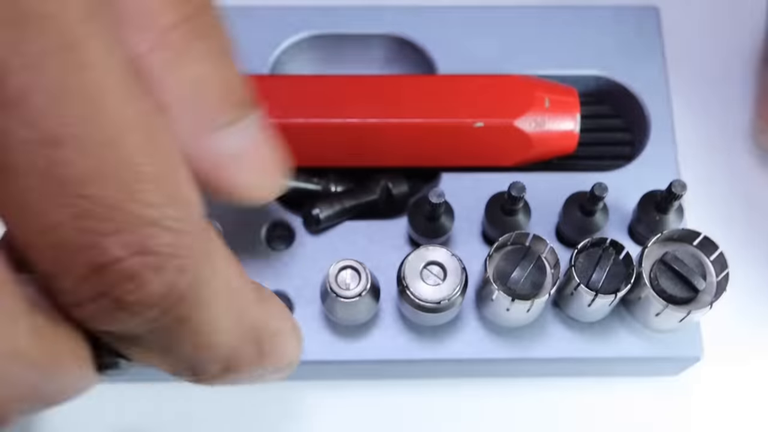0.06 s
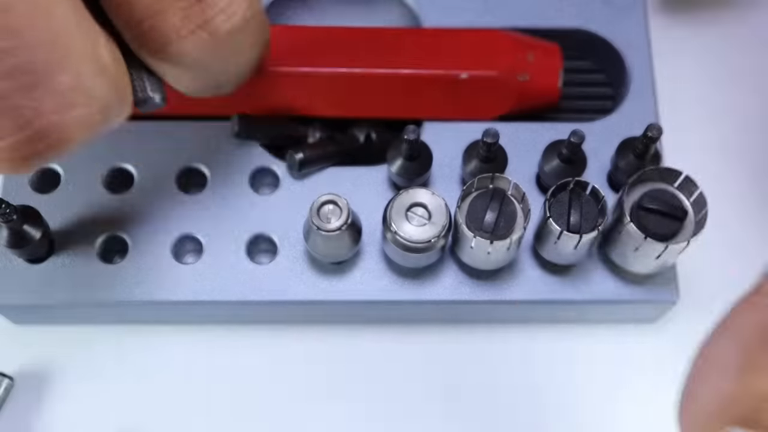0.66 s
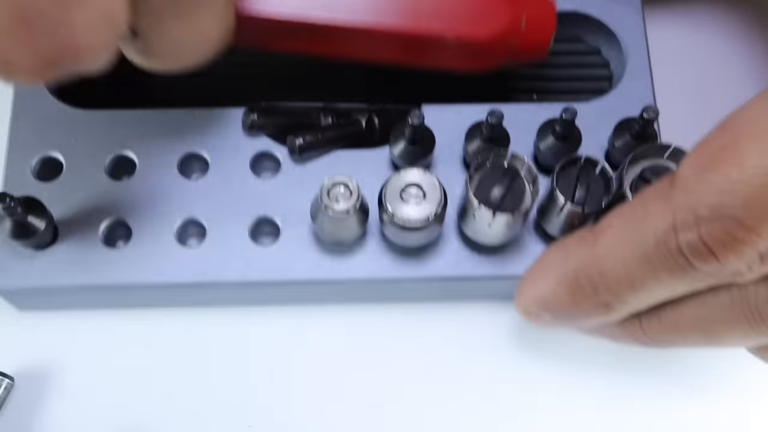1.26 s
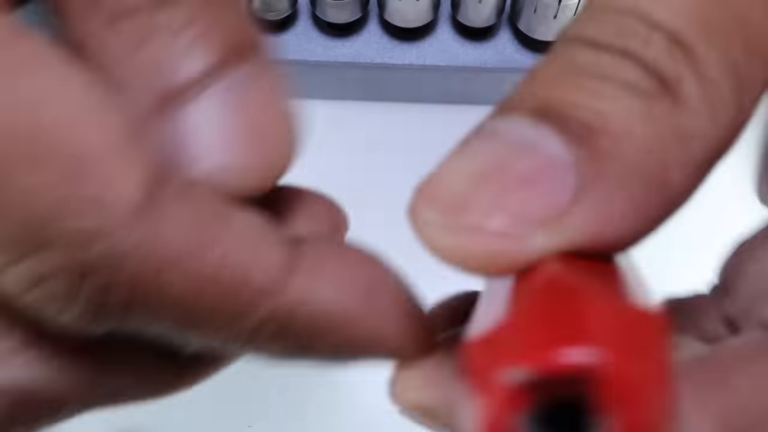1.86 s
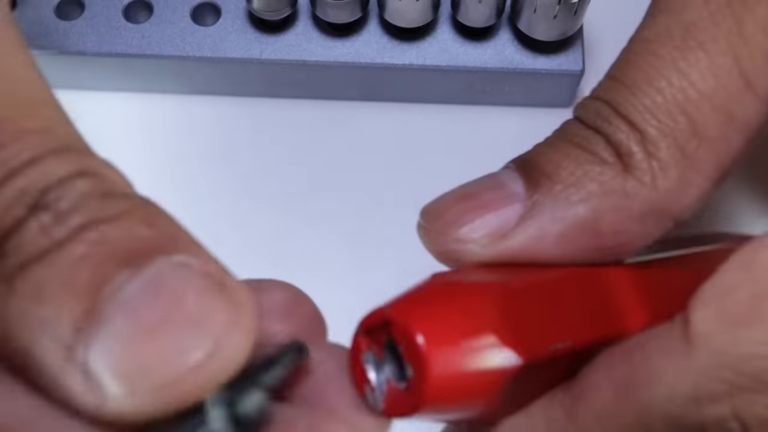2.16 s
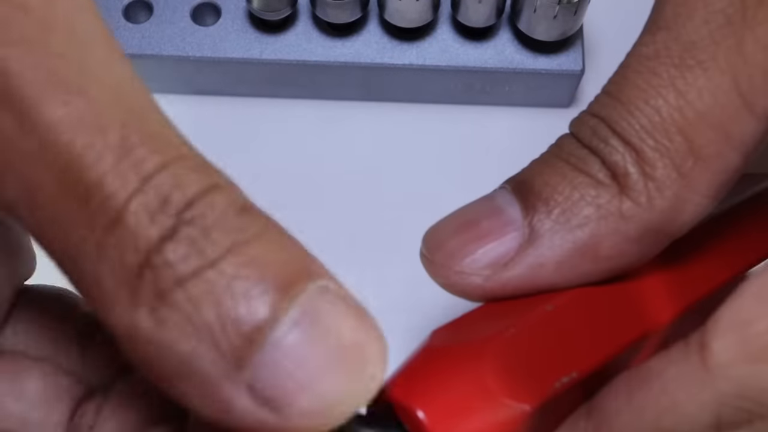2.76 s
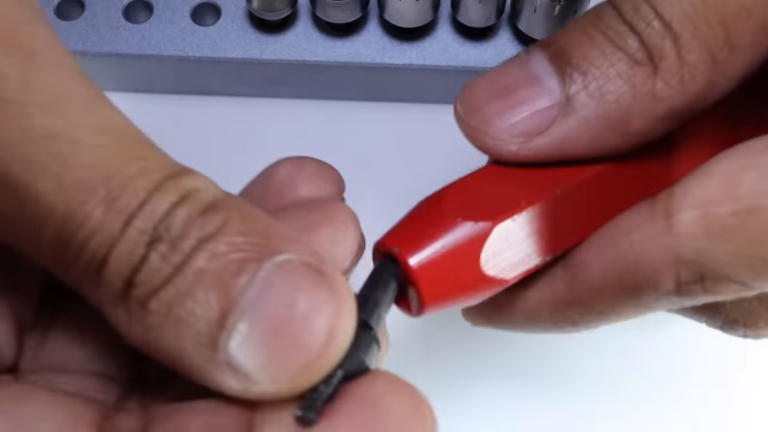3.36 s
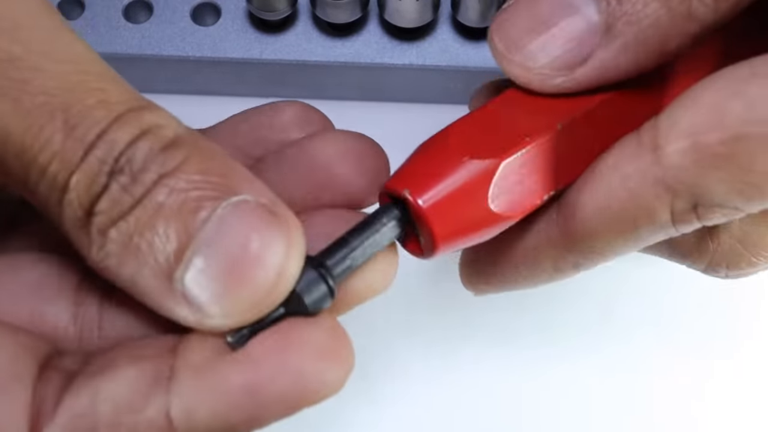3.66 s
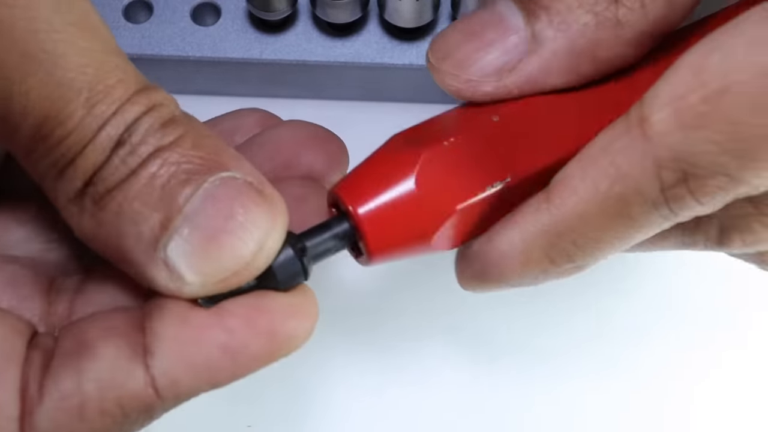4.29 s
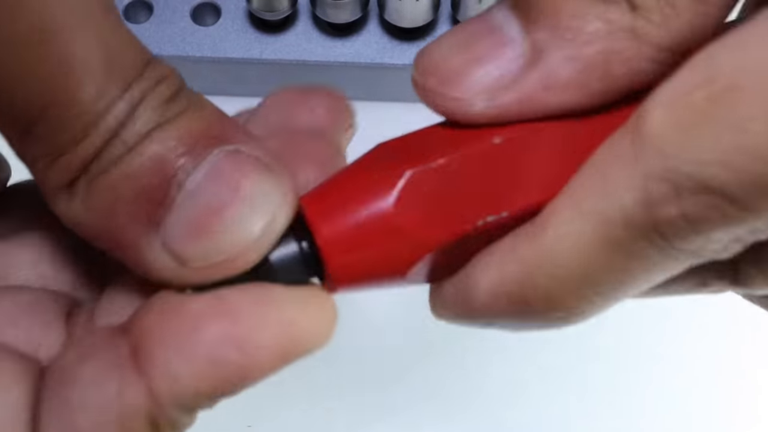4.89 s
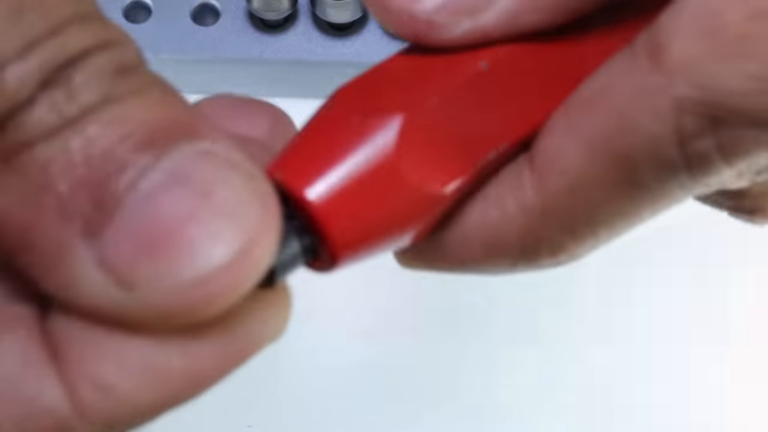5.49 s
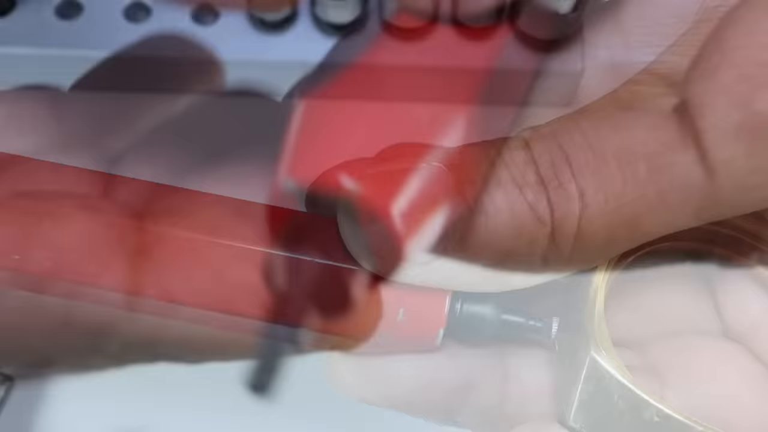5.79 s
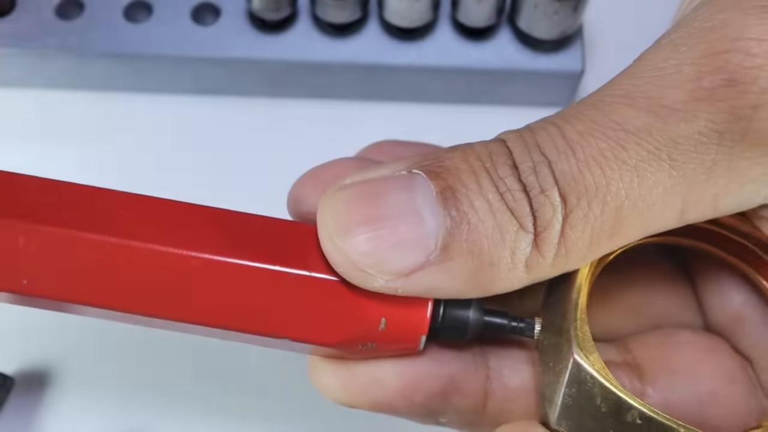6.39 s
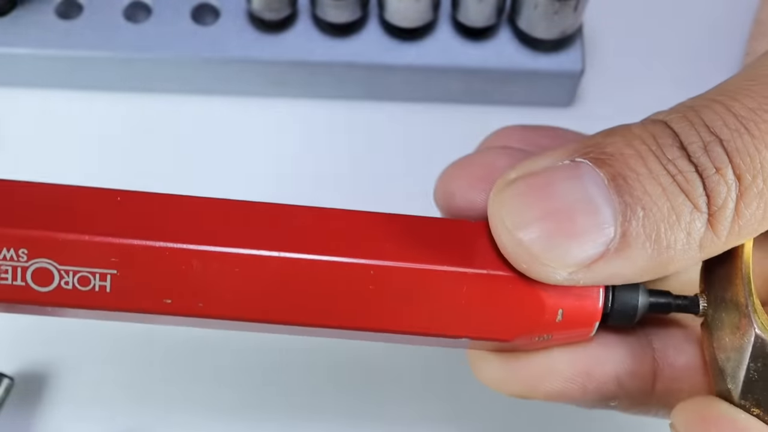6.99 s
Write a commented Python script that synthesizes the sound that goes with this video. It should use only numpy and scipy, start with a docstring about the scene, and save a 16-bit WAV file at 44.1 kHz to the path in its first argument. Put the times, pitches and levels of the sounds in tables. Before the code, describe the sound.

A metal holder block knocks on a workbench, a steel bit ticks and clicks into a handle, and the tool snaps against a watch case.

```python
"""A steel bit and a handle are lifted from a metal holder block, which knocks and slides on a workbench.
Up close, the bit ticks and scrapes at the handle's socket and clicks home; later the tool snaps hard
against a metal watch case. Hits are ringing modes plus a burst of noise; rubs and slides are grainy
noise. A small room answers, over mains hum and a soft hiss."""
import sys
import numpy as np
from scipy import signal
from scipy.fft import rfft, irfft, next_fast_len
from scipy.io import wavfile
from scipy.ndimage import uniform_filter1d, map_coordinates

SR = 44100
rng = np.random.default_rng(int(sys.argv[2]) if len(sys.argv) > 2 else 0)


def waveform_to_disk(signal):
    """Save audio, clipped to [-1, 1], as 16-bit WAV at the path in sys.argv[1]."""
    frames = np.transpose(np.atleast_2d(signal))
    scaled = np.clip(frames, -1, 1) * 32767
    samples = np.round(scaled).astype(np.int16)
    wavfile.write(sys.argv[1], SR, samples)


N = 310464
TIME = np.arange(N) / SR
T = np.arange(SR // 3) / SR  # time within one hit


def amp(db):
    """Decibels to gain."""
    return 10 ** (np.asarray(db) / 20)


def unit(x):
    """Scale to rms 1."""
    return x / np.sqrt(np.mean(x ** 2) + 1e-20)


def punch(x):
    """Scale a hit so that its loudest three milliseconds have rms 1."""
    return x / np.sqrt(uniform_filter1d(x ** 2, 128).max() + 1e-20)


def along(points, hz):
    """Read (frequency, value) points on a log axis."""
    freqs, values = np.transpose(points)
    return np.interp(np.log(hz + 1), np.log(freqs + 1), values)


def wobble(rate):
    """A smooth random curve, rate knots a second."""
    return map_coordinates(rng.standard_normal(int(N * rate / SR) + 4), [TIME * rate])


def colour(x, spectrum):
    """Minimum-phase EQ through (frequency, level) points."""
    size = 2 * next_fast_len(len(x))
    cepstrum = irfft(np.log(amp(along(spectrum, np.fft.rfftfreq(size, 1 / SR)))))
    cepstrum[1:size // 2] *= 2
    cepstrum[size // 2 + 1:] = 0
    return irfft(rfft(x, size) * np.exp(rfft(cepstrum)))[:len(x)]


def noise(spectrum):
    """Steady coloured noise of rms 1."""
    return unit(colour(rng.standard_normal(N), spectrum))


def friction(spectrum, grain_db, rate):
    """Noise made of tiny slips of uneven strength."""
    return unit(colour(rng.standard_normal(N) * amp(grain_db * wobble(rate)), spectrum))


def crack(spectrum, t60):
    """The noise burst of two surfaces meeting."""
    return punch(colour(rng.standard_normal(len(T)) * amp(-60 * T / t60), spectrum))


def ring(modes, scatter_db, attack):
    """Decaying modes, their levels scattered anew on each hit."""
    hz, db, t60 = np.transpose(modes)[:, :, None]
    strength = db + scatter_db * rng.standard_normal(hz.shape)
    sign = (-1) ** np.arange(len(hz))[:, None]  # neighbouring modes swing opposite ways
    waves = sign * np.sin(2 * np.pi * hz * T)
    return punch((amp(strength - 60 * T / t60) * waves).sum(0) * (1 - np.exp(-T / attack)))


def strokes(rows, attack, release):
    """Envelope of strokes: each rises, holds, then falls 60 dB per release time."""
    gain = np.zeros(N)
    for s, length, db in rows:
        rise = np.clip((TIME - s) / attack, 0, 1)
        gain += rise * amp(db - 60 * np.maximum(TIME - s - length, 0) / release)
    return gain


def place(s, sound):
    """A full-length track with the sound at time s."""
    return np.pad(sound, (round(s * SR), N))[:N]


# small-room reverb: (frequency [Hz], t60 [s], level [dB])
REVERB = [(149.6, 0.34, -5.5), (800, 0.3, 3), (1990, 0.42, 0.5), (3540, 0.43, -5.5), (4600, 0.45, -3),
          (7460, 0.44, -14), (11000, 0.21, 2.5), (14900, 0.26, -14)]
def room(x, wet_db):
    """A sound plus a diffuse tail that builds fast and dies at each frequency's own speed."""
    hz, t, bands = signal.stft(rng.standard_normal(SR // 2), SR, nperseg=256)
    t60, echo_db = (along(np.array(REVERB)[:, [0, k]], hz)[:, None] for k in (1, 2))
    tail = signal.istft(bands * amp(echo_db - 60 * t / t60), SR, nperseg=256)[1]
    tail *= 1 - np.exp(-np.arange(len(tail)) / SR / .0011)
    wet = amp(wet_db) * signal.fftconvolve(x, tail / np.linalg.norm(tail))
    return wet + np.pad(x, (0, len(tail) - 1))


# mains partials: (frequency [Hz], level [dB])
HUM = [(50, -56.5), (100, -55.5), (150, -77), (200, -66), (300, -77.5), (350, -78.5), (400, -77.5)]
# EQ of the centred room tone and of the wide hiss: (frequency [Hz], level [dB])
AIR_EQ = [(20, -3.5), (50, -2.5), (130, -4.5), (220, -3.5), (300, -22.5), (480, -15.5), (700, -19.5),
          (870, -18), (1300, -25.5), (3000, -31), (6000, -31), (12500, -30.5), (13500, -59), (16000, -69)]
HISS_EQ = [(100, -31), (350, -2.5), (12400, -2.5), (13200, -28)]
def room_tone():
    """A stereo bed of gently wavering mains hum and soft hiss."""
    side = amp(-76.5) * noise(HISS_EQ)
    hum = np.zeros(N)
    for hz, db in HUM:
        peak = np.sqrt(2) * amp(db + .3 * wobble(8.7))
        hum += peak * np.sin(2 * np.pi * (hz * TIME + rng.random()))
    mid = hum + amp(-63.5) * noise(AIR_EQ)
    return np.array([mid + side, mid - side])


# finger rubs on the handle, weight shifts on the bench: (time [s], length [s], level [dB])
RUBS = [(0, 0.13, -66.5), (.26, 0.074, -64.5), (.75, 0.017, -66), (1.07, 0.023, -67.5), (1.57, 0.26, -69),
        (2.26, 1.4, -75.5), (4.57, 0.27, -74), (4.68, 0.041, -67.5), (4.94, 0.11, -69.5)]
SHIFTS = [(.06, 0.034, -60), (.75, 0.082, -55.5), (.9, 0.089, -57), (1.107, .12, -52.5),
          (3.583, 0.022, -58), (4.55, 0.22, -68.5)]
# EQ of bright skin rustle and dull handling: (frequency [Hz], level [dB])
SKIN_EQ = [(300, -30), (1400, -3), (1900, -8), (2500, -3.5), (3100, -4.5), (3750, 0), (4400, -7.5),
           (5200, -6.5), (7000, -14), (10000, -20.5), (16000, -51)]
HANDLING_EQ = [(100, -10), (200, -1), (400, -4.5), (650, -9), (880, -1), (1150, -16), (2000, -25.5),
               (10000, -69)]
def hands():
    """Fingers rub and hands shift; even held still they rustle, less as they settle."""
    holding = amp(-61 - 2.13 * TIME)
    rub = np.hypot(strokes(RUBS, attack=.015, release=.7), amp(-79))
    shift = np.hypot(strokes(SHIFTS, attack=.009, release=.34), holding)
    skin = rub * friction(SKIN_EQ, grain_db=1, rate=200)
    return skin + shift * friction(HANDLING_EQ, grain_db=1.94, rate=150)


# modes of the block's metal, its hollow body and the bench: (frequency [Hz], level [dB], t60 [s])
METAL_MODES = [(2250, -14, .025), (3430, -4, .016), (3780, 0, .022), (4080, -3, .015), (4600, -5, .02),
               (5400, -6, .018), (5780, -6, .024), (7250, -16, .022)]
HOLLOW_MODES = [(494, -1.5, 0.18), (760, -11, 0.088), (856, 10.5, 0.073), (969, -2, 0.092),
                (1100, -1.5, .05), (1350, -10, 0.034)]
BENCH_MODES = [(165.8, -1.5, 0.16), (222.6, 4, 0.072), (272, -8, 0.072), (347, -14, 0.056)]
# EQ of their transients: (frequency [Hz], level [dB])
CLACK_EQ = [(300, -21), (1000, -17), (2000, 0), (2800, 3.5), (3800, 4.5), (5800, 3), (8000, -8.5),
            (13000, -1.5), (16000, -15)]
KNOCK_EQ = [(200, -42), (450, 3), (900, 3.5), (1300, -3.5), (2200, -20.5), (4000, -37), (10000, -58)]
THUMP_EQ = [(60, -37), (130, -22), (220, 1.5), (400, -12.5), (700, -24), (2000, -75), (8000, -52)]
def block_hit(s, clack_db, knock_db, reach_hz, thump_over_knock_db=-9):
    """Metal clack, hollow knock and bench thump; a harder contact favours the upper modes."""
    metal = ring(METAL_MODES, scatter_db=5, attack=.000067) + amp(-.5) * crack(CLACK_EQ, t60=.018)
    low_cut = signal.butter(2, .46 * reach_hz, "high", fs=SR, output="sos")
    high_cut = signal.butter(4, reach_hz, fs=SR, output="sos")
    clack = punch(signal.sosfilt(high_cut, signal.sosfilt(low_cut, metal)))
    thump = ring(BENCH_MODES, scatter_db=2, attack=.001) + amp(-5) * crack(THUMP_EQ, t60=.037)
    knock = ring(HOLLOW_MODES, scatter_db=5, attack=.000081) + amp(1) * crack(KNOCK_EQ, t60=.045)
    body = punch(knock) + amp(thump_over_knock_db) * punch(thump)
    return place(s, room(amp(clack_db) * clack, wet_db=-15.5) + room(amp(knock_db) * body, wet_db=-7.5))


# fingers landing on the block: (time [s], thump level [dB])
PRESSES = [(.2915, -38), (0.3359, -30.5), (.374, -43), (1.106, -38)]
def presses():
    """Fingers press the block against the bench; flesh hardly stirs the metal."""
    return sum(block_hit(s, db - 20, db - 14.5, reach_hz=7000, thump_over_knock_db=14.5)
               for s, db in PRESSES)


# steel hits on the block: (time [s], clack level [dB], knock level [dB], treble reach [Hz])
CLACKS = [(0.4297, -33.5, -39.5, 10500), (0.4774, -36, -45, 4040), (0.5034, -48, -44.5, 6000),
          (0.551, -51, -55, 4370), (0.9264, -34, -42, 5140), (1.1867, -44.5, -41, 4300),
          (1.25, -37, -36, 3180), (1.5221, -46.5, -57, 9000), (1.5654, -37, -56, 10900),
          (1.6582, -48.5, -60, 6500)]
def clacks():
    """Steel strikes the block, with a lighter graze just ahead of each hit."""
    out = np.zeros(N)
    for s, clack_db, knock_db, reach_hz in CLACKS:
        out += block_hit(s - .009, clack_db - 16, knock_db - 16, reach_hz=5500)
        out += block_hit(s, clack_db, knock_db, reach_hz)
    return out


# pushes on the block: (time [s], length [s], level [dB])
SLIDES = [(.425, 0.121, -56), (1.255, .32, -54.5)]
# EQ of bench drag and steel grit: (frequency [Hz], level [dB])
DRAG_EQ = [(150, 1), (400, 7.5), (650, -3), (880, 11), (1200, -2), (2300, -5.5), (3900, 1.5), (4800, -8.5),
           (5800, -5), (8500, -20), (14500, -23), (16000, -30)]
GRIT_EQ = [(1000, -30), (3000, -11), (4700, 2), (6000, 0), (8000, -9), (12000, -20), (16000, -21)]
def slides():
    """The block drags and chatters over the bench, while steel scrapes grittily on it."""
    push = strokes(SLIDES, attack=.0068, release=.23)
    drag = friction(DRAG_EQ, grain_db=2.5, rate=700)
    grit = amp(-9) * friction(GRIT_EQ, grain_db=3, rate=250)
    out = room(push * (drag + grit), wet_db=-11)[:N]
    chatter_s, scatter_db = .028, 3.5
    for s, length, db in SLIDES:
        gaps, sizes = rng.standard_normal((2, 16))
        delays = np.cumsum(chatter_s * np.exp(gaps / 2)) - chatter_s / 2
        for delay, size in zip(delays, sizes):
            if 0 < delay < length:
                out += block_hit(s + delay, db + scatter_db * size, db, reach_hz=7500)
    return out


# jolts to the loose bits: (time [s], level [dB])
JINGLES = [(0.432, -47.5), (.552, -61), (1.271, -57), (1.285, -64)]
# their thin ring: (frequency [Hz], level [dB], t60 [s])
LOOSE_MODES = [(7170, 1, .025), (10200, -1, .03), (11550, -8, .13), (13080, -2, .06)]
def jingles():
    """Jolts shake the loose bits in their holes."""
    return sum(place(s, room(amp(db) * ring(LOOSE_MODES, scatter_db=3, attack=.00035), wet_db=-17))
               for s, db in JINGLES)


def rocking():
    """Freed of the handle, the block rocks: three quick contacts, each 1 dB softer."""
    return sum(block_hit(1.268 + .018 * k, clack_db=-39.5 - k, knock_db=-51 - k, reach_hz=7500)
               for k in range(3))


# rubs of the shank: (time [s], length [s], level [dB], starting pitch [Hz])
SCRAPES = [(1.555, .012, -38, 4500), (2.894, 0.01, -58.5, 1300), (3.785, 0.008, -39.5, 2930),
           (4.024, 0.0085, -59, 2580), (4.667, 0.026, -46, 1707), (4.734, 0.019, -48.5, 1464)]
# EQ of steel touching steel: (frequency [Hz], level [dB])
STEEL_EQ = [(300, -14), (1000, -6), (2200, 3.5), (3800, 4.5), (4800, -0.5), (8000, -5), (9500, 2.5),
            (11000, -22), (14000, -17), (16000, -56)]
def scrapes():
    """The bit's shank rubs along the socket, squeaking upward as it speeds up."""
    out = np.zeros(N)
    glide_hz_per_s = 110000
    for s, length, db, start_hz in SCRAPES:
        pressure = np.interp(T / length, [0, .3, .85, 1.1], [.22, .55, 1, .0012])  # grows, slips free
        rub = colour(pressure * rng.laplace(size=len(T)), STEEL_EQ)
        pitch = start_hz + glide_hz_per_s * np.minimum(T, length)
        squeak = pressure * wobble(884)[:len(T)] * np.sin(2 * np.pi * np.cumsum(pitch) / SR)
        out += place(s, room(amp(db) * punch(punch(rub) + punch(squeak)), wet_db=-17.5))
    return out


def pluck():
    """The bit leaves its hole and rings freely on one high note."""
    hz, t60 = 9827, .37
    ping = ring([(hz, 0, t60)], scatter_db=0, attack=.0004)
    return place(1.567, room(amp(-63.5) * ping, wet_db=-19))


# touches of bit on handle: (time [s], tick level [dB], ring level [dB])
TICKS = [(2.2922, -61, -80), (2.789, -44.5, -48), (2.8122, -55, -62), (3.187, -45.5, -53),
         (3.744, -55.5, -79), (3.7948, -40.5, -36.5), (4.034, -47.5, -52), (4.0626, -48, -51),
         (4.0738, -47.5, -47), (5.675, -61, -82)]
# the bit's ping: (frequency [Hz], level [dB])
BIT_MODES = [(9350, -18), (9660, 11), (9780, -30)]
def ticks():
    """The bit hunts for the socket; the looser the grip, the louder and longer it rings."""
    out = np.zeros(N)
    for s, tick_db, ring_db in TICKS:
        t60 = .02 * 2 ** ((ring_db - tick_db) / 21)
        ping = ring([(hz, db, t60) for hz, db in BIT_MODES], scatter_db=2, attack=.0004)
        tick = crack(STEEL_EQ, t60=.019)
        out += place(s, room(amp(tick_db) * tick + amp(ring_db) * ping, wet_db=-16.5))
    return out


# EQ of the seating click and its faint bright tail: (frequency [Hz], level [dB])
CLICK_EQ = [(100, -24.5), (400, -2.5), (1000, -12.5), (2200, 0.5), (4600, 0), (5300, -4), (5900, 0),
            (7300, 5), (8100, -6.5), (9300, 1), (10600, -10), (11200, -17), (15000, -23)]
SHIMMER_EQ = [(1000, -21), (3000, -14), (6500, 3), (9300, 1), (11000, -10), (15000, -23.5)]
def seat():
    """The bit clicks home and the handle jolts in the hand with a soft thud."""
    click = crack(CLICK_EQ, t60=.0093) + amp(-30) * crack(SHIMMER_EQ, t60=.34)
    thud = amp(-21) * crack(THUMP_EQ, t60=.041)
    return place(4.7547, room(amp(-28.5) * (click + thud), wet_db=-28))


# the watch case's ring: (frequency [Hz], level [dB], t60 [s])
CASE_MODES = [(820, -24.5, 0.021), (964, -21.5, 0.036), (1900, -8, 0.05), (2620, -15, 0.027),
              (3050, -6.5, 0.013), (3420, -1, 0.012), (3700, -2, 0.0069), (4290, -10.5, 0.017),
              (4586, -13.5, 0.056), (5230, -16.5, 0.013), (5740, -11.5, 0.023), (6490, -17.5, .02),
              (7470, -3.5, .028), (7620, -12, .035), (9140, -13.5, .018), (11270, -25.5, 0.0178),
              (13200, -18.5, .018), (15080, -6.5, .015)]
# EQ of the snap's transient: (frequency [Hz], level [dB])
SNAP_EQ = [(100, -12), (450, -14), (850, -9), (1400, -12.5), (2200, -4.5), (3400, 0), (4800, -6.5),
           (7500, -5), (10000, -22.5), (15000, -20)]
def snap():
    """The tool slips against the hand-held case: a crack, steel modes and one low push."""
    steel = punch(ring(CASE_MODES, scatter_db=0, attack=.00047) + amp(-4) * crack(SNAP_EQ, t60=.028))
    choke = amp(-60 * np.maximum(T - .008, 0) / .013)  # the parts come to rest together
    push = np.sin(2 * np.pi * 130 * T) * amp(-60 * T / .012)
    return place(6.5457, room(amp(-12) * steel * choke - amp(-24.5) * push, wet_db=-11))


def scene():
    """The bench sounds sit dead centre; only the soft hiss has width."""
    bed = room_tone() + hands()
    block = presses() + clacks() + slides() + jingles() + rocking()
    bit = scrapes() + pluck() + ticks() + seat()
    return bed + block + bit + snap()


def record(dry):
    """A steep high cut at 15.9 kHz."""
    return signal.sosfilt(signal.ellip(10, .1, 80, 15900, fs=SR, output="sos"), dry)


dry = scene()
out = record(dry)
waveform_to_disk(out)
```